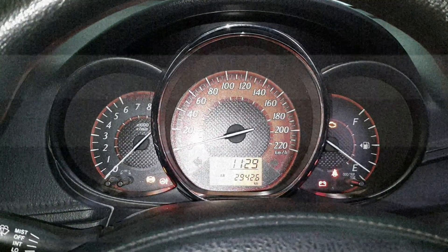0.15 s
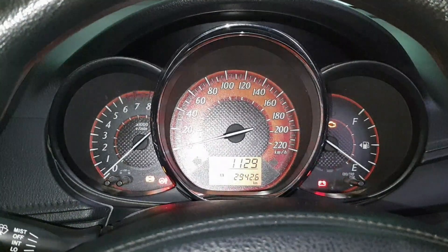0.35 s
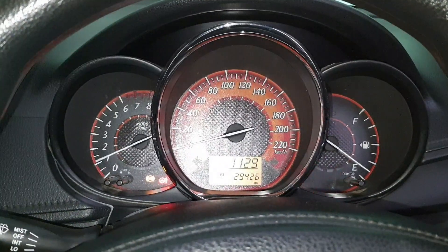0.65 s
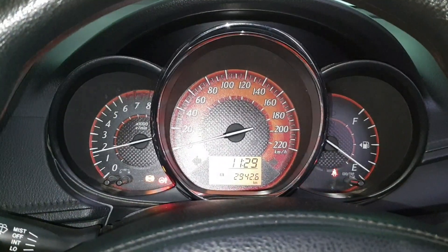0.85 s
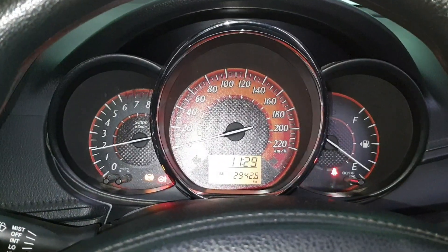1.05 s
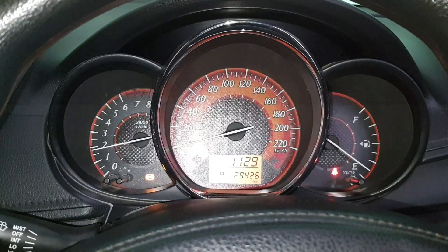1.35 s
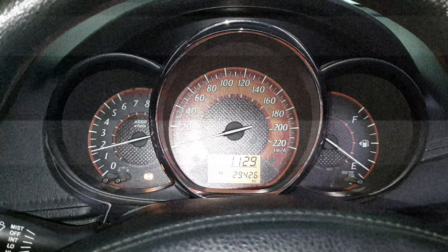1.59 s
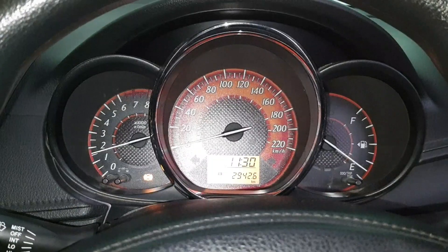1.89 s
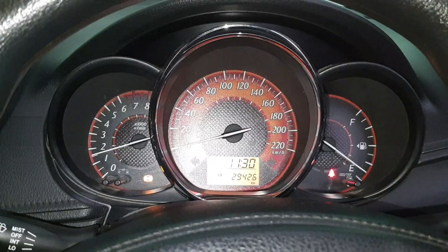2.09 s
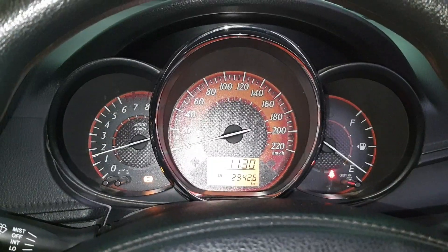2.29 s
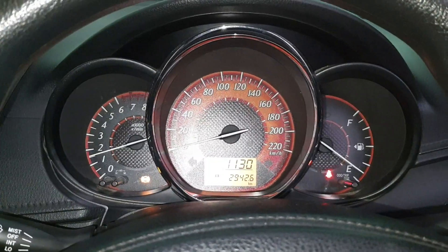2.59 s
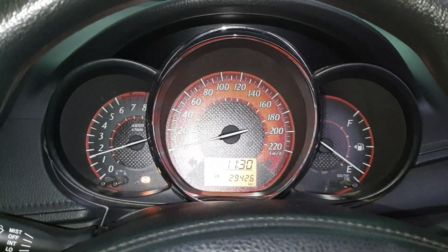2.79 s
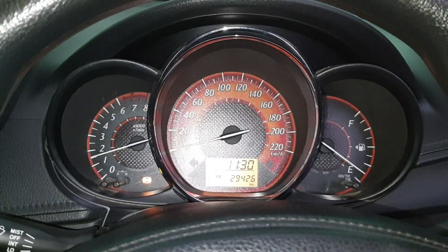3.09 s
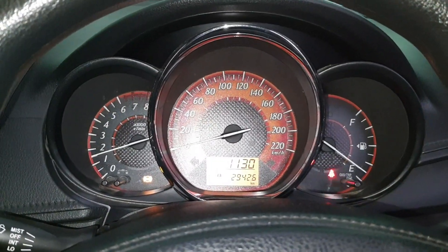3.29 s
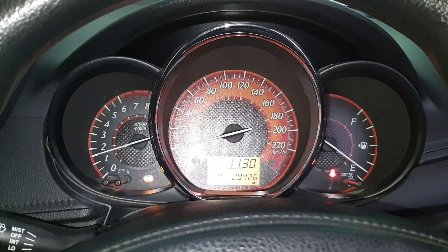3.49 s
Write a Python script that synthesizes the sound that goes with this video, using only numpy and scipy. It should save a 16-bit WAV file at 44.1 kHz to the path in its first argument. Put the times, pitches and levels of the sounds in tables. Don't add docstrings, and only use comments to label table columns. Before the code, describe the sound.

A car engine cranks briefly, catches with heavy thuds, flares and settles into a fast idle.

```python
import sys
import numpy as np
from scipy import signal
from scipy.fft import rfft, irfft
from scipy.io import wavfile
from scipy.ndimage import uniform_filter1d

SR = 44100
rng = np.random.default_rng(int(sys.argv[2]) if len(sys.argv) > 2 else 0)


def ratio(d):
    e = np.asarray(d, float) / 20
    return 10 ** e


def master(y):
    cut = np.clip(np.atleast_2d(y).T, -1, 1)
    pcm = np.round(cut * 32767)
    wavfile.write(sys.argv[1], SR, pcm.astype(np.int16))


N = 160965
TIME = np.arange(N) / SR
HZ = np.maximum(np.arange(N // 2 + 1) * SR / N, 1)


def rms_one(x):
    return x / np.sqrt(np.mean(x ** 2) + 1e-20)


def at_hz(points, hz):
    table_hz, value = np.array(points)[:, 0], np.array(points)[:, 1]
    return np.interp(np.log(hz), np.log(np.maximum(table_hz, 1)), value)


def drift(rate):
    r = np.exp(-80 * np.pi * rate / SR)
    slow = signal.lfilter([1], [1, -2 * r, r * r], rng.standard_normal(N // 40 + 2002))[2000:]
    return np.interp(np.arange(N) / 40, np.arange(len(slow)), rms_one(slow))


def bump(middle_s, half_s):
    return np.exp(-((TIME - middle_s) / half_s) ** 2)


def ring(clicks, hz, t60):
    r, w = ratio(-60 / (t60 * SR)), 2 * np.pi * min(hz, 16000) / SR
    return signal.lfilter([0, np.sin(w)], [1, -2 * r * np.cos(w), r * r], clicks + 1e-18)


def colour(spectrum, patchy_db=0., grains=None):
    # f/Hz, correlation/1
    likeness = [(60, 0.83), (180, 0.95), (400, 0.42), (700, 0.22), (1650, 0.067), (4970, 0.17), (15000, .1)]
    mid, side = rfft(rng.standard_normal((2, N)) * (1 if grains is None else grains))
    alike = np.clip(at_hz(likeness, HZ), 0, 1)
    pair = np.sqrt(1 + alike) * mid + np.sqrt(1 - alike) * side * [[1], [-1]]
    pair = pair * ratio(at_hz(spectrum, HZ))
    band = np.floor(2 * np.log2(HZ))
    inside = (HZ > spectrum[0][0]) & (HZ < spectrum[-1][0])
    out = 0
    for k in np.unique(band[inside]):
        out = out + ratio(patchy_db * drift(9)) * irfft(pair * (band == k), N)
    return rms_one(out)


def strikes(rows, modes, spread_db, damp):
    s, db = np.transpose(rows)
    luck, out = rng.normal(0, 1, (len(s), len(modes))), np.zeros(N)
    for k, (hz, level_db, t60) in enumerate(modes):
        clicks = np.zeros(N)
        clicks[(s * SR).astype(int)] = ratio(db + level_db + spread_db * luck[:, k]) * (-1) ** k
        out += ring(clicks, hz, t60 * damp)
    return out


def starter():
    # t/s, level/dB, bogging/(dB/s2)
    strokes = [
        (-.02, -36.5, 775),
        (0.171, -36.5, 681),
        (0.309, -36, 805),
        (0.436, -35, 507),
        (0.578, -36, 898),
    ]
    # f/Hz, level/(dB/Hz)
    crank_low = [(18, -68), (30, -20), (74, -3.5), (104, -11), (146, -8.5), (225, -32.5), (430, -19),
                 (538, -32), (700, -35), (910, -55), (1540, -120)]
    # f/Hz, level/(dB/Hz)
    crank_high = [(350, -44), (600, -16), (734, 4), (785, 0.5), (1790, -10.5), (2370, -17), (2820, -10),
                  (5540, -12.5), (15000, -33)]
    # start, full, release, silence, each t/s
    overrun_s = (.43, .6, .9, .96)
    attack_s, teeth_per_s = 0.019, 780
    heave = 0
    for s, db, fade_db in strokes:
        age = np.maximum(TIME - s, 0)
        stroke = np.clip(age / attack_s, 0, 1) * ratio(db - fade_db * age ** 2)
        heave = np.maximum(heave * (TIME < s + attack_s), stroke)
    heave = heave + ratio(-52) * (TIME < overrun_s[1])

    teeth = .5 + (rng.random(N) < teeth_per_s / SR) * 1.1
    mesh = ratio(-25.5) * heave ** .77 * colour(crank_high, grains=teeth)
    freewheel = ratio(-62) * np.interp(TIME, overrun_s, [0, 1, 1, 0])
    freewheel = freewheel * colour([(3000, -8.0), (8000, -5.5), (14000, -14.5)])
    clack = ratio(-53) * bump(.635, .008) * colour([(400, -13), (1900, 16), (2600, -20)])
    return heave * colour(crank_low, patchy_db=0.5) + freewheel + mesh + clack


def whines():
    # middle t/s, half length/s, f/Hz, level/dB
    passing = [(0.081, 0.063, 212, -46.5), (.045, 0.04, 1050, -59), (0.058, 0.04, 2000, -63.5),
               (0.047, 0.055, 4370, -63), (0.26, 0.043, 5260, -64), (0.337, .02, 1800, -63),
               (0.363, 0.03, 3800, -60), (0.466, 0.038, 3880, -59), (.61, 0.025, 474, -43.5),
               (0.56, 0.062, 140, -37.5), (0.3, .05, 432, -55), (0.098, 0.033, 90, -46),
               (0.234, 0.043, 82, -38.5), (.35, 0.029, 85, -37), (0.414, 0.031, 80.2, -41),
               (0.606, 0.032, 232, -45.5), (0.76, .03, 290, -51), (1.06, .04, 62, -37.5),
               (.831, .004, 10500, -56), (.847, .008, 4680, -48), (1.3, 0.0025, 680, -56)]
    sharpness = 10
    out = 0
    for s, half_s, hz, db in passing:
        shape = 1 / (1 + ((HZ - hz) / (hz / sharpness / 2)) ** 2)
        mid, side = rfft(rng.standard_normal((2, N)))
        tone = rms_one(irfft((mid + 0.73 * side * [[1], [-1]]) * shape, N))
        out = out + ratio(db) * bump(s, half_s) * tone
    return out


def catch():
    # t/s, peak level/dB
    thuds = [(.205, -32.5), (.335, -28), (.475, -32), (.535, -31.5), (.566, -18), (.584, -14.5),
             (.600, -23), (.620, -13), (.656, -17.5), (.682, -21), (.735, -23.5), (.764, -23.5)]
    # f/Hz, level/dB, t60/s
    shell = [(46, -12, 0.15), (76, 1, 0.15), (98, -1, 0.13), (137, -8, 0.15), (167, -14, 0.13)]
    # t/s, peak level/dB
    knocks = [
        (.335, -50),
        (.455, -44),
        (.475, -40.5),
        (.575, -44),
        (.592, -42.5),
        (.607, -40),
        (.885, -42),
        (1.02, -47.5),
    ]
    # f/Hz, level/dB, t60/s
    bulkhead = [(274.4, 2.5, 0.13), (319, -7, 0.11), (367, -18, 0.13), (433, -11, 0.19), (468, -4.5, 0.11)]
    blows = ratio(-2.5) * strikes(thuds, shell, spread_db=0.5, damp=1)
    soft = signal.butter(2, 220, fs=SR, output="sos")
    return signal.sosfilt(soft, blows) + strikes(knocks, bulkhead, spread_db=2.5, damp=0.96)


def pump(firing_turn):
    hum_hz, in_step_s, on_s, rise_s = 97.92, 2.91, 1.0, 0.38
    turn = 2 * firing_turn[int(in_step_s * SR)] + 2 * np.pi * hum_hz * (TIME - in_step_s)
    swell = np.clip((TIME - on_s) / rise_s, 0, 1)
    return ratio(-37.5 + .5 * drift(2)) * swell * np.sin(turn + .49 * np.array([[.6], [-.6]]))


def engine():
    # t/s, intake load level/dB, exhaust boom level/dB, manifold drone level/dB
    strength = [(.55, 1.5, 16, 3), (.642, -1.5, 12.5, -1), (.69, 9, 1, 18), (.80, 1, -1.5, 6),
                (0.879, 3, 0.5, 7.5), (0.969, -2.5, -8.5, 7.5), (1.22, -5, -2, -6), (1.381, 1, -12, 2.5),
                (1.471, 9.5, -0.5, 2.5), (1.571, 5, 4, 2.5), (1.709, 3, 13.5, -2), (1.8, 1.5, -1, -1.5),
                (2.0, 0, 5.5, -1.5), (2.35, -2, -15, 2), (2.7, -0.5, 0.5, 3.5), (3.25, 0, -0.5, 5),
                (3.368, -7, -11.5, 6), (3.52, 1.5, 5.5, -3)]
    # t/s, firing rate f/Hz
    speed = [(.55, 33), (.65, 44), (.76, 54.5), (.88, 60.5), (1.0, 64.3), (1.12, 64.6), (1.3, 62),
             (1.5, 58), (1.72, 55.0), (1.9, 53.0), (2.05, 52.5), (2.25, 52.03), (2.65, 51.93), (3.1, 51.68),
             (3.4, 51.38), (3.65, 51.1)]
    # multiple of firing rate/1, rms level/dB
    orders = [(1, -47.5), (1.25, -59.5), (1.75, -52), (2, -40.5), (2.5, -56), (3, -61.5), (4, -59),
              (5, -73), (5.25, -65.5), (6, -67.5), (7, -65), (7.75, -68), (8, -70.5), (9, -60.5), (14, -70)]
    # f/Hz, width/Hz, lift/dB
    booms = [(59.2, 3, 16.5), (79.6, 21, 8), (115, 10, -3), (178, 16.2, 19.5), (251.4, 6.7, -16.5),
             (312.1, 9.9, 9), (469.3, 17, 14), (550, 67, -9), (732, 19, 9.5)]
    # middle t/s, half length/s, multiple/1, lift/dB
    swells = [
        (1.055, 0.1, 7, 11),
        (.83, 0.035, 8, 7.5),
        (0.92, .07, 5, 14),
        (1.9, 0.33, 8, 11),
        (1.8, .15, 7, 7),
        (1.25, 0.13, 7, 5),
        (1.25, 0.035, 5, 6),
        (.88, .07, 3, 4),
    ]
    # f/Hz, level/(dB/Hz)
    rumble_colour = [(15, -51), (25, -17), (109, -6), (253, -21.5), (409, -18.5), (466, -20.5), (559, -33),
                     (640, -31.5), (730, -26), (1300, -47), (1800, -86.5)]
    # f/Hz, level/(dB/Hz)
    hiss_colour = [(650, -16.5), (1100, -3.5), (1190, -14.5), (2140, -12), (2390, -7.5), (2730, -17.5),
                   (4590, -7.5), (6460, -23.5), (15500, -34.5)]
    load_db, boom_db, drone_db = [np.interp(TIME, *pair) for pair in
                                  [(np.transpose(strength)[0], c) for c in np.transpose(strength)[1:]]]
    rate_hz = uniform_filter1d(np.interp(TIME, *np.transpose(speed)), size=3000)
    turn = 2 * np.pi * np.cumsum(rate_hz) / SR
    running = np.clip((TIME - .5) / 0.11, 0, 1)
    flare_db, flare_end_s, settle_s = 5.5, 0.89, 0.67
    extra_db = flare_db * np.exp(-np.maximum(TIME - flare_end_s, 0) / settle_s)
    effort_db = {1: boom_db, 2: load_db, 3: drone_db}
    wander_spread_db = {1: 0, 2: 0, 3: .8, 9: .8}

    tones = 0
    for order, db in orders:
        lift_db = sum(up / (1 + ((order * rate_hz - hz) / width) ** 2) for hz, width, up in booms)
        lift_db += sum(up * bump(s, half_s) for s, half_s, which, up in swells if round(which) == order)
        wander_db = wander_spread_db.get(order, 3) * drift(2.13)
        rough_db = (order > 2) * .25 * extra_db + (order == 14) * 2.5
        wander_db += rough_db * drift(13.3) + effort_db.get(order, extra_db)
        ears = .49 * np.sqrt(order) * rng.uniform(0.24, 0.7) * np.array([[1], [-1]])
        phase = ears + (order != 2) * rng.uniform(0, 5.71)
        tones = tones + ratio(db + 3 + lift_db + wander_db) * np.sin(order * turn + phase)

    gate = 1 + .038 * np.cos(turn / 2) * np.cos(turn)
    build = np.clip((TIME - .6) / .3, 0, 1)
    rumble = ratio(-43 + 1.505 * extra_db * build) * colour(rumble_colour, patchy_db=2.0) * gate
    hiss = ratio(-64 + 1.61 * extra_db) * colour(hiss_colour, patchy_db=.6) * gate
    bright = ratio(-88 + 2.2 * extra_db) * colour([(5000, 9.0), (8000, -12), (15000, -21.5)])
    return running * (tones + rumble + hiss + bright) + pump(turn)


def key():
    # t/s, level/dB
    scrape = [
        (.812, -78.5),
        (.816, -44.5),
        (.827, -51),
        (.83, -42),
        (.85, -40.5),
        (.876, -46),
        (.90, -53.5),
        (.925, -54),
        (.95, -63),
    ]
    # f/Hz, level/(dB/Hz)
    scrape_colour = [(350, -43), (600, -8.5), (953, -2), (1140, -11.5), (2370, -11.5), (3920, -18),
                     (4750, -20.5), (12600, -25.5), (15500, -36)]
    # t/s, peak level/dB
    touches = [
        (0.88, -36),
        (0.8843, -19),
        (0.8868, -23),
        (0.8893, -24),
        (0.892, -25),
        (0.8952, -27),
        (0.903, -44),
    ]
    # f/Hz, level/dB, t60/s
    key_modes = [(4506, -29, 0.1), (6700, -20, 0.03), (9700, -18, 0.05), (11350, -10, 0.06),
                 (13230, -3, 0.06), (12900, -6, 0.05), (14300, -12, 0.05), (12400, -8, 0.06)]
    grains_per_s, pan_db, crack_t60_s = 1100, 2.5, 0.018
    grain_db = 3.0 * np.minimum(rng.exponential(1, N), 3)
    grains = 1.0 + (rng.random(N) < grains_per_s / SR) * ratio(grain_db)
    scrape_level = ratio(np.interp(TIME, *np.transpose(scrape), left=-140, right=-140))

    jingle = np.array([ratio(-side * pan_db - 10.5) * strikes(touches, key_modes, spread_db=1.0, damp=.2)
                       for side in (1, -1)])
    burst = sum(ratio(db - 19 - 60 * np.maximum(TIME - s, 0) / crack_t60_s) * (TIME > s) for s, db in touches)
    crack = burst * colour([(700, -17), (3000, 0.5), (7000, -2.5), (11000, -2.5), (13300, 5.5), (15500, -3)])
    left, right = jingle + crack * ratio(pan_db * np.array([[-1], [1]]))
    bunch = np.array([left, np.roll(right, 1)])

    rustle = ratio(-72) * bump(1.72, .045) * colour([(6000, 0.5), (15000, -0.5)])
    return scrape_level * colour(scrape_colour, grains=grains) + bunch + rustle


def scene():
    # f/Hz, left minus right level/dB
    lean = [(60, -2.5), (180, -6.5), (550, 2), (1650, -7), (4970, 2.5), (15000, -6.5)]
    cabin = starter() + whines() + catch() + engine() + key()
    return irfft(rfft(cabin) * ratio(at_hz(lean, HZ) * [[.5], [-.5]]), N)


def band_limit(x):
    return signal.sosfilt(signal.butter(12, 15710, fs=SR, output="sos"), x)


def record(dry):
    low_cut = signal.butter(2, 29.6, "high", fs=SR, output="sos")
    top_cut = signal.ellip(10, .5, 70, 15450, fs=SR, output="sos")
    mix = signal.sosfilt(top_cut, signal.sosfilt(low_cut, dry))
    return band_limit(mix)


dry = scene()
out = record(dry)
master(out)
```